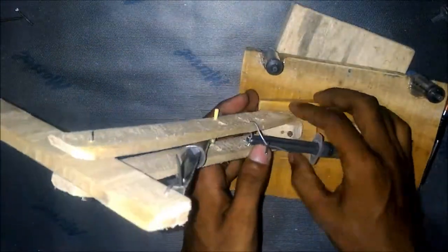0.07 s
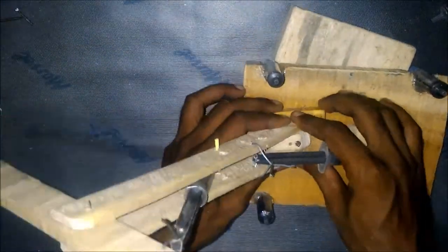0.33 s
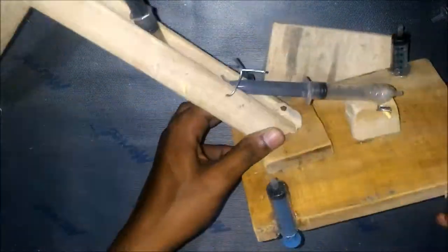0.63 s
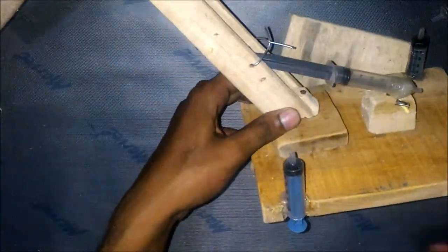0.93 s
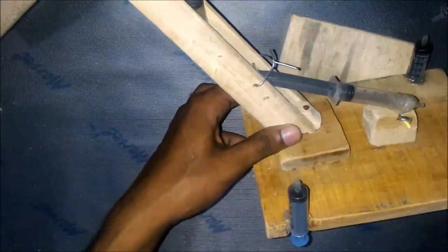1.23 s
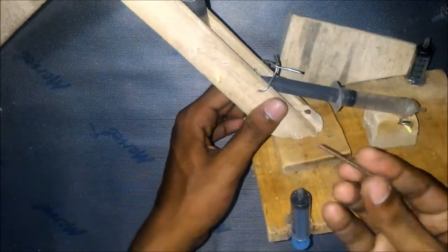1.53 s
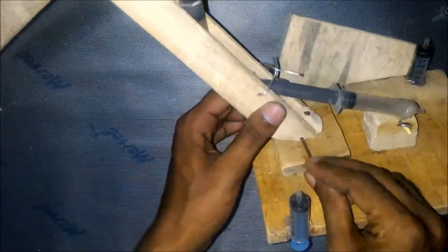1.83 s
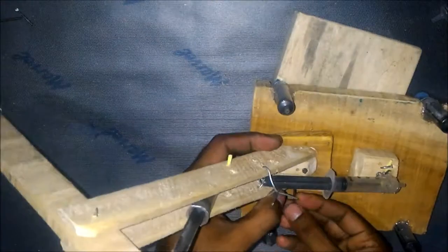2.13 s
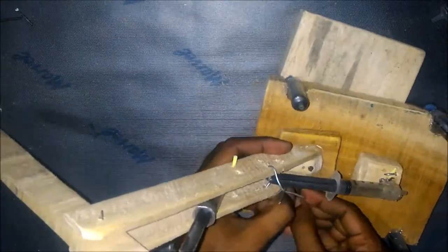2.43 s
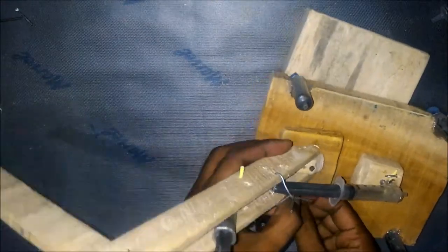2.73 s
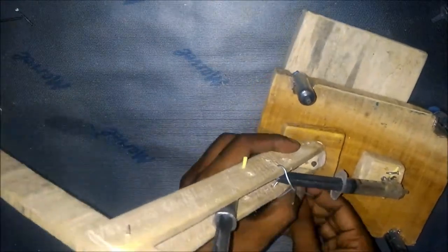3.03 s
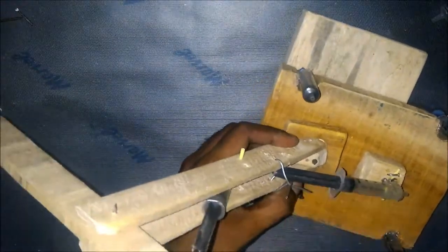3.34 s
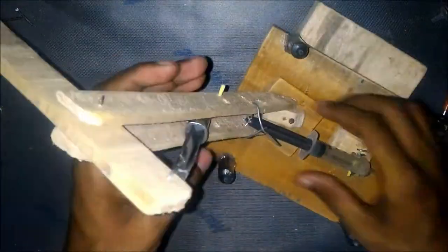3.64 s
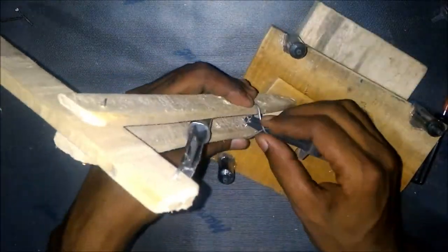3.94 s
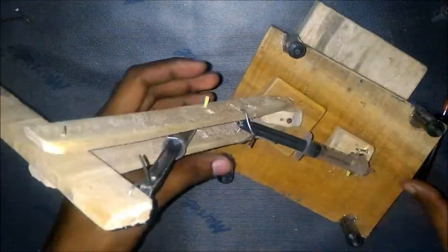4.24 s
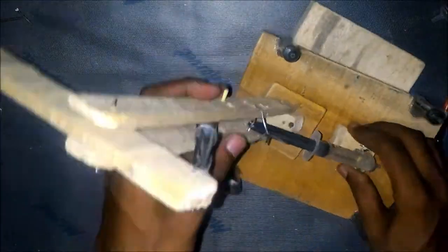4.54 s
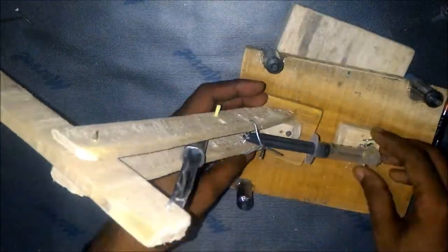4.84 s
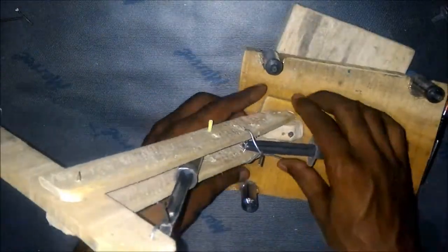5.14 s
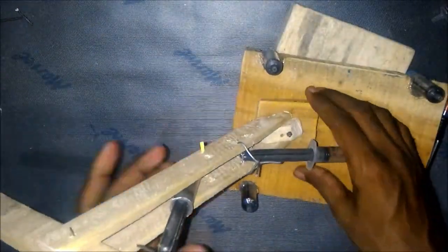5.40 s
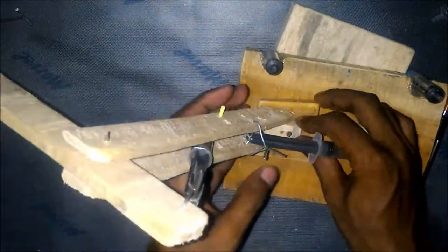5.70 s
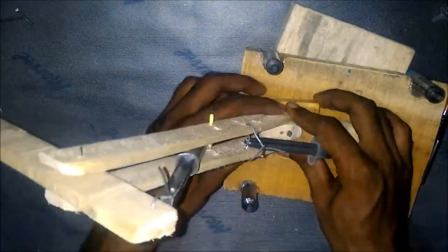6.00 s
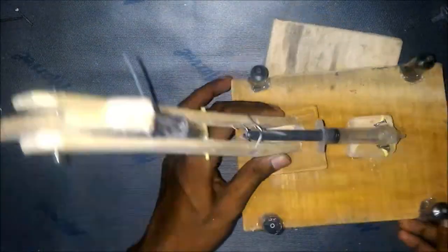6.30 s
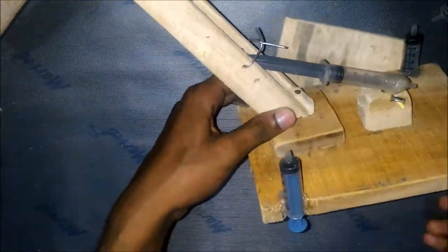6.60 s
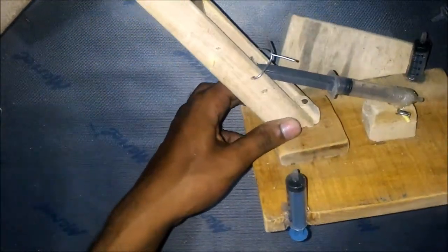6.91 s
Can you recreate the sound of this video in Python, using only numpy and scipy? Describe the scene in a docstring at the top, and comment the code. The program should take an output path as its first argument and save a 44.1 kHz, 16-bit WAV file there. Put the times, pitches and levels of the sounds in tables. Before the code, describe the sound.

Close, irregular microphone pops with low thumps, short hisses and needle-sharp clicks, over constant mains hum and dull rumble.

```python
"""Electrical crackle on a microphone line, dry, very close and almost mono.
Mains hum with a thin buzz and a dull rumble run from the start. Two pops open, each a short hiss burst,
a low thump and an end tick, with needle-sharp clicks. From 1.5 s come a double-click pop, a hissy pop,
a rumbling pop and two more plain ones; from 3.7 s the hissy, rumbling and double-click pops return.
Around 6 s a hard crack sounds during each of the two last pops."""
import sys
import numpy as np
from scipy import signal
from scipy.fft import rfft, irfft, next_fast_len
from scipy.io import wavfile
from scipy.ndimage import map_coordinates

SR = 44100
rng = np.random.default_rng(int(sys.argv[2]) if len(sys.argv) > 2 else 0)


def waveform_to_disk(signal):
    """Save audio, clipped to [-1, 1], as 16-bit WAV at the path in sys.argv[1]."""
    frames = np.transpose(np.atleast_2d(signal))
    scaled = np.clip(frames, -1, 1) * 32767
    samples = np.round(scaled).astype(np.int16)
    wavfile.write(sys.argv[1], SR, samples)


N = 311346
TOP_HZ = 16300


def amp(db):
    return 10 ** (np.asarray(db) / 20)


def filtered(x, response):
    """x times a complex response of frequency."""
    n = x.shape[-1]
    padded = next_fast_len(n + SR // 2)
    return irfft(rfft(x, padded) * response(np.fft.rfftfreq(padded, 1 / SR)), padded)[..., :n]


def contour(hz, points):
    """Gain at hz from (Hz, dB) points on a log axis."""
    knots_hz, db = np.transpose(points)
    return amp(np.interp(np.log(hz + 1), np.log(knots_hz), db))


def coloured(x, points):
    """x shaped by (Hz, dB) points, at rms 1."""
    shaped = filtered(x, lambda hz: contour(hz, points))
    return shaped / np.sqrt(np.mean(shaped ** 2) + 1e-20)


def wobble(rate, size=N):
    """A smooth random curve, rate knots a second."""
    knots = rng.standard_normal(int(size * rate / SR) + 4)
    return map_coordinates(knots, [np.arange(size) * rate / SR])


def arch(t, length):
    """One half sine from 0 to length."""
    return np.sin(np.pi * np.clip(t / length, 0, 1))


def swell(t, rise_s, fall_db_per_s):
    """Envelope of a burst: it swells, then fades."""
    return np.clip(t / rise_s, 0, 1) ** 2 * amp(-fall_db_per_s * np.maximum(t - rise_s, 0))


def add(track, s, sound):
    """Mix a mono or stereo sound into the stereo track at time s."""
    part = track[:, round(s * SR):][:, :sound.shape[-1]]
    part += sound[..., :part.shape[-1]]


# hum on the microphone line: (multiple of the mains frequency, rms level [dB])
HUM_HARMONICS = [(1, -53), (2, -62), (3, -69), (4, -67.5), (6, -78), (7, -86), (8, -86.5), (9, -82),
                 (10, -83), (12, -92.5), (13, -91.5), (15, -87), (16, -95), (17, -93), (21, -90.5),
                 (27, -96.5)]
# spikes in each mains cycle: (position [cycles], relative level [dB])
BUZZ_SPIKES = [(.0425, 1), (.5163, -3), (.8444, -12)]
# spectrum of a 0 dB spike: (frequency [Hz], level [dB])
BUZZ_SPECTRUM = [(300, -93), (700, -101), (1100, -100), (1700, -104), (2400, -108), (3200, -113),
                 (5000, -124), (9000, -140), (16000, -155)]
def hum(mains_hz=60.025, waver_db=.65, size=2048):
    """One mains cycle repeats: its sharp spikes make a thin buzz above the strong low harmonics."""
    k = np.arange(size // 2 + 1)
    hz = k * mains_hz
    comb = -sum(amp(db) * np.exp(-2j * np.pi * k * position) for position, db in BUZZ_SPIKES)
    harmonics = comb * contour(hz, BUZZ_SPECTRUM) * (hz < TOP_HZ)
    for multiple, db in HUM_HARMONICS:
        harmonics[round(multiple)] *= amp(db) / abs(harmonics[round(multiple)])
    cycle = irfft(harmonics) * size / np.sqrt(2)
    steady = np.interp(np.arange(N) / SR * mains_hz, np.arange(size) / size, cycle, period=1)
    return amp(waver_db * wobble(12)) * steady


# noise floor, centre: (frequency [Hz], relative level [dB])
FLOOR_SPECTRUM = [(15, 4), (35, 1), (80, 2.5), (160, -1.5), (300, -9.5), (600, -20.5), (1200, -33.5),
                  (2500, -42), (5000, -47.5), (9000, -52), (15000, -59.5)]
# noise floor, opposite in left and right: (frequency [Hz], relative level [dB])
SIDE_SPECTRUM = [(20, -2), (42, -9), (85, -13.5), (180, -26.5), (700, -40.5), (2800, -51.5), (11000, -61),
                 (15000, -58.5)]
def background(mid_db=-62, side_db=-68):
    """Dull steady rumble with a trace of hiss; a fainter part differs between the channels."""
    mid = amp(mid_db) * coloured(rng.standard_normal(N), FLOOR_SPECTRUM)
    side = amp(side_db) * coloured(rng.standard_normal(N), SIDE_SPECTRUM)
    return np.array([mid + side, mid - side])


# hiss of a pop, near the centre: (frequency [Hz], relative level [dB])
HISS_SPECTRUM = [(60, 6), (200, 0.5), (350, 1.5), (700, -9), (1500, -13), (3000, -16.5), (6000, -23.5),
                 (11000, -26.5), (16000, -29.5)]
def hiss(t, db, fall_db_per_s, grain_db=1.5, lowpass_hz=11500, bright_s=.045, side_db=-21):
    """A short grainy hiss burst, low-passed at 11.5 kHz after 45 ms."""
    noise = rng.standard_normal((2, len(t))) * amp(grain_db * wobble(1500, len(t)))
    mid, side = coloured(noise, HISS_SPECTRUM)
    grains = np.array([mid + amp(side_db) * side, mid - amp(side_db) * side])
    dull = filtered(grains, lambda hz: 1 / (1 + (hz / lowpass_hz) ** 20))
    unfiltered_share = amp(-400 * np.maximum(t - bright_s, 0))  # falls 400 dB a second
    return amp(db) * swell(t, .014, fall_db_per_s) * (dull + (grains - dull) * unfiltered_share)


def thump(t, pulse_db, pulse_s, rebound_db, ring_hz, ring_db):
    """The signal swings one way, swings back more slowly and rings low for a few cycles."""
    pulse = amp(pulse_db) * arch(t, pulse_s) ** .64  # the power broadens the top of the arch
    rebound = amp(rebound_db) * arch(t - pulse_s, 2.1 * pulse_s)
    age = t * ring_hz / 1.92  # the ring peaks after 1.92 cycles
    ring = amp(ring_db) * (age * np.exp(1 - age)) ** 4 * np.sin(2 * np.pi * ring_hz * t)
    return pulse - rebound + ring


# low rumble of a pop, centre: (frequency [Hz], relative level [dB])
RUMBLE_SPECTRUM = [(20, 8), (45, 7.5), (100, -2), (170, -4), (300, -17.5), (600, -28), (1500, -49),
                   (11000, -54), (13500, -75)]
def rumble(t, db):
    """A burst of low noise that roughens the thump."""
    noise = coloured(rng.standard_normal(len(t)), RUMBLE_SPECTRUM)
    return amp(db) * noise * swell(t, rise_s=.014, fall_db_per_s=100)


def tick(t, db, decay_s=.0066, lowpass_hz=10000):
    """A small decaying step in the signal: a dull tick."""
    step = amp(db) * np.exp(-t / decay_s)
    return signal.lfilter(*signal.butter(4, lowpass_hz, fs=SR), step)


def pop(start, end, rumble_db, hiss_db, fade_db_per_s, tick_db, lead_s=.007, **thump_shape):
    """One electrical pop: hiss just ahead of the thump; hiss and rumble stop at the end tick."""
    out, t = np.zeros((2, N)), np.arange(SR // 4) / SR
    length_s = end - start
    add(out, start - lead_s, hiss(t, hiss_db, fade_db_per_s) * (t < length_s + lead_s))
    add(out, start, thump(t, **thump_shape) + rumble(t, rumble_db) * (t < length_s))
    add(out, end, tick(t, tick_db))
    return out


# plain pops on the microphone line:
# (start [s], end [s], pulse [dB], pulse length [s], rebound [dB], hiss [dB], end tick [dB])
PLAIN_POPS = [ (0.303, 0.475, -27, .031, -35, -54, -80), (1.156, 1.276, -27.5, .039, -41, -54.5, -43),
              (2.659, 2.843, -31.5, .026, -46, -51, -55), (2.720, 2.782, -35, .043, -56, -60.5, -62),
              (5.926, 6.0324, -30, .02, -32, -53.5, -47), (6.243, 6.3442, -27.5, .028, -43, -55, -45)]
def plain_pops():
    """Electrical pops, each different: the stronger the pulse, the more it rumbles and rings."""
    return sum(pop(start, end, rumble_db=db - 12.5, hiss_db=hiss_db, fade_db_per_s=150,
                   tick_db=tick_db, pulse_db=db, pulse_s=pulse_s, rebound_db=rebound_db,
                   ring_hz=150, ring_db=db - 18)
               for start, end, db, pulse_s, rebound_db, hiss_db, tick_db in PLAIN_POPS)


def click(s, db, bright_hz, low_hz, width_s=0, size=512):
    """One electrical spike at s, rolled off at both ends; its width notches the spectrum."""
    hz = np.fft.rfftfreq(size, 1 / SR)
    highpass = (1j * hz / (low_hz + 1j * hz)) ** 2
    spectrum = amp(db) * highpass * np.sinc(hz * width_s) / (1 + (hz / bright_hz) ** 2)
    out = np.zeros((2, N))
    add(out, s - size / 2 / SR, np.fft.fftshift(irfft(spectrum)))
    return out


# microphone crackle, dry and centred: (time [s], drive [dB], brightness [Hz], low edge [Hz])
CRACKLE_CLICKS = [ (0.3116, -9, 2800, 750), (0.4229, -33, 3000, 200), (1.1135, -37, 2400, 200),
                  (1.1354, -39, 2000, 200), (1.1819, -8.5, 3700, 480), (2.6343, -33, 1600, 200),
                  (2.6724, -13, 4900, 100), (2.6735, -17.5, 2200, 100), (2.679, -24.5, 5500, 200),
                  (2.7263, -27, 9700, 200), (2.7817, -32.5, 7000, 200), (5.9078, -23, 1500, 200),
                  (5.931, -11.2, 3640, 250), (5.9965, -17, 1750, 500), (6.2959, -32.5, 5000, 200)]
def crackle(tail_gain_db=-29.5, tail_hz=360, t60_s=.009):
    """Scattered electrical clicks, each with a dull, very short tail."""
    out, t = np.zeros((2, N)), np.arange(SR // 20) / SR
    tail = amp(tail_gain_db - 60 * t / t60_s) * np.sin(2 * np.pi * tail_hz * t)
    for s, db, bright_hz, low_hz in CRACKLE_CLICKS:
        out += click(s, db, bright_hz, low_hz)
        add(out, s, amp(db) * tail)
    return out


# double-click pops on the line: (time [s])
DOUBLE_POP_TIMES = [1.4587, 4.8644]
# first click, its stutter, second click, its stutter: (drive [dB], brightness [Hz], low edge [Hz])
DOUBLE_POP_CLICKS = [(-16.3, 5500, 120), (-23.5, 5000, 120), (-15.5, 7000, 2800), (-24.5, 4500, 120)]
def double_pop(s, second_s=.0094, stutter_s=.0012):
    """A pop with a short ringing thump and a double click."""
    body = pop(start=s - .011, end=s + .0664, rumble_db=-45.5, hiss_db=-55.5, fade_db_per_s=205,
               tick_db=-47.5, pulse_db=-28.5, pulse_s=.038, rebound_db=-58, ring_hz=88, ring_db=-36)
    delays = [0, stutter_s, second_s, second_s + stutter_s]
    return body + sum(click(s + delay, *row) for delay, row in zip(delays, DOUBLE_POP_CLICKS))


# hissy pops on the line: (time [s])
HISSY_POP_TIMES = [1.9566, 3.6816]
def hissy_pop(s):
    """A pop with a smooth thump, a strong hiss burst and one bright click."""
    body = pop(start=s - .015, end=s + .1069, rumble_db=-56, hiss_db=-52, fade_db_per_s=170,
               tick_db=-54, pulse_db=-28.5, pulse_s=.03, rebound_db=-32.5, ring_hz=85, ring_db=-46)
    return body + click(s, db=-21.5, bright_hz=10000, low_hz=500)


# rumbling pops on the line: (time [s])
RUMBLING_POP_TIMES = [2.1476, 4.0841]
# first click, second click, its stutter: (drive [dB], brightness [Hz], low edge [Hz])
RUMBLING_POP_CLICKS = [(-22, 5700, 640), (-33, 7000, 200), (-27, 4300, 200)]
def rumbling_pop(s, second_s=.0353, stutter_s=.0012):
    """A click opens a rough thump; a stuttering click follows, then a firm end tick."""
    body = pop(start=s + .005, end=s + .0975, rumble_db=-43, hiss_db=-58, fade_db_per_s=130,
               tick_db=-38.7, pulse_db=-29.5, pulse_s=.035, rebound_db=-33, ring_hz=138, ring_db=-35.5)
    delays = [0, second_s, second_s + stutter_s]
    return body + sum(click(s + delay, *row) for delay, row in zip(delays, RUMBLING_POP_CLICKS))


# hard cracks on the line: (time [s], drive [dB], brightness [Hz], low edge [Hz], spike width [s])
HARD_CRACKS = [(5.9402, -4, 14000, 1950, .000143), (6.267, -7.5, 7000, 600, .000189)]
def cracks():
    """Strong electrical spikes whose width makes them sound hollow."""
    return sum(click(*row) for row in HARD_CRACKS)


def scene():
    """The microphone line: pops and clicks sit dry in the middle, over hum and noise floor."""
    pops = plain_pops() + crackle()
    pops += sum(map(double_pop, DOUBLE_POP_TIMES))
    pops += sum(map(hissy_pop, HISSY_POP_TIMES))
    pops += sum(map(rumbling_pop, RUMBLING_POP_TIMES))
    return pops + cracks() + hum() + background()


def record(dry):
    """The recorder's band ends in a 600 Hz wide slope centred on TOP_HZ."""
    return filtered(dry, lambda hz: np.clip((TOP_HZ - hz) / 600 + .5, 0, 1))


dry = scene()
out = record(dry)
waveform_to_disk(out)
```